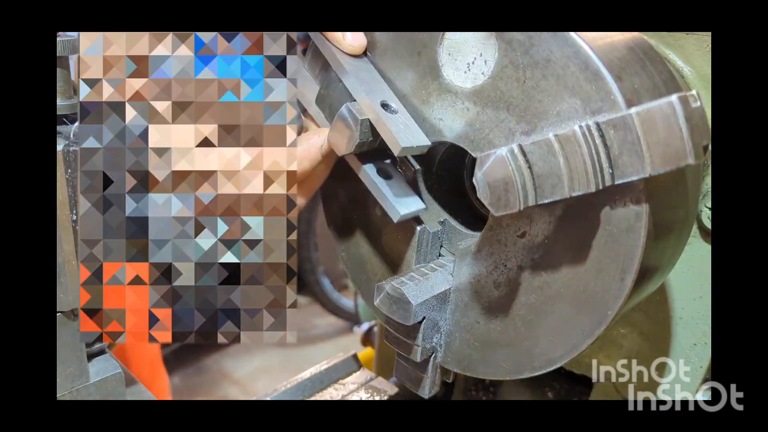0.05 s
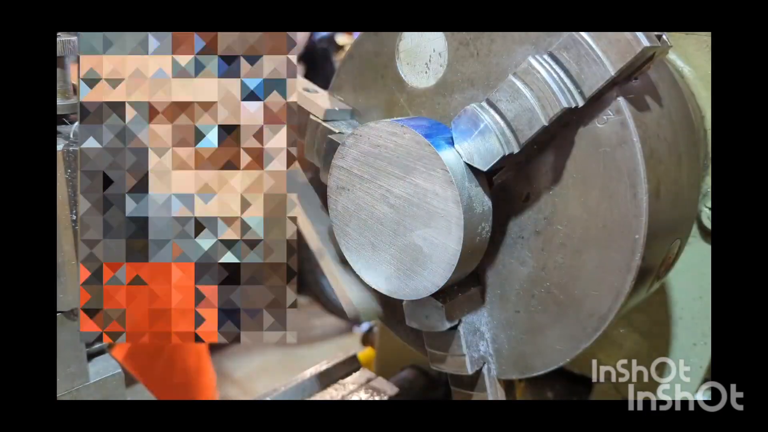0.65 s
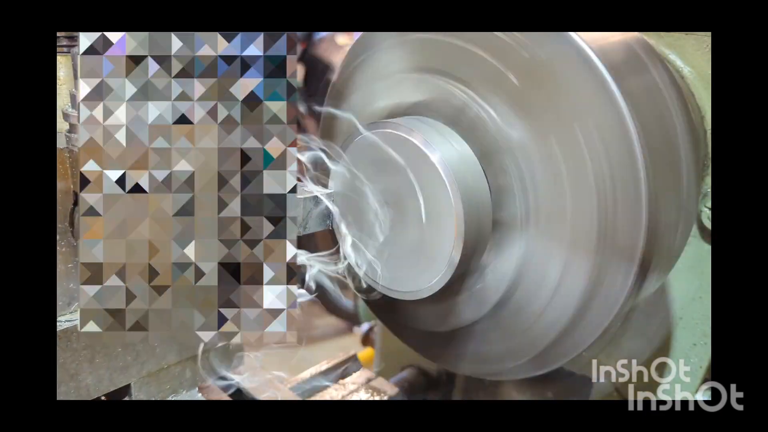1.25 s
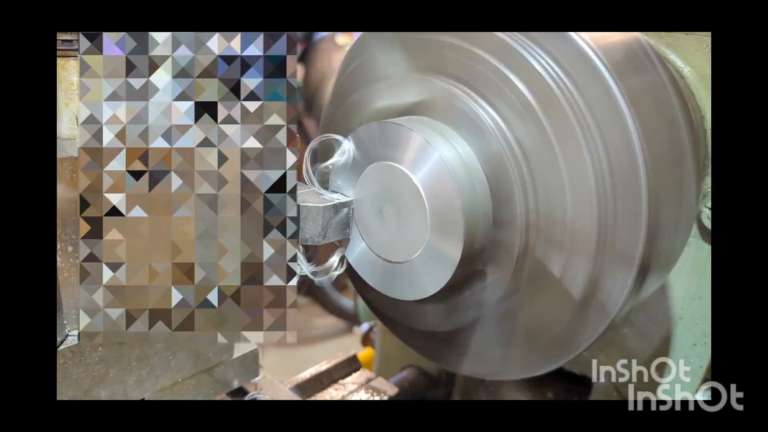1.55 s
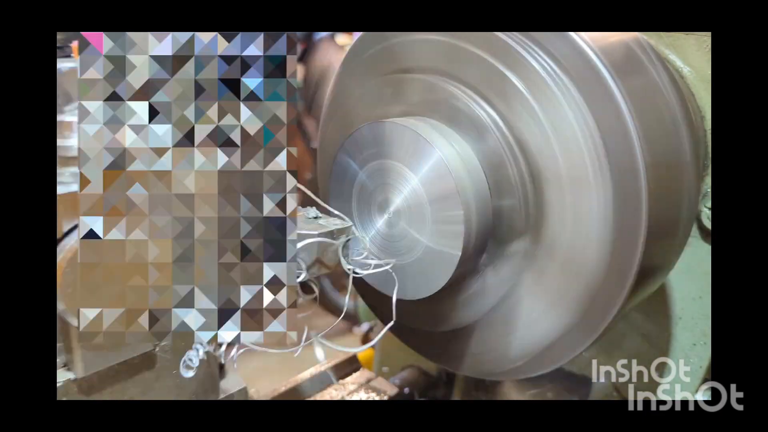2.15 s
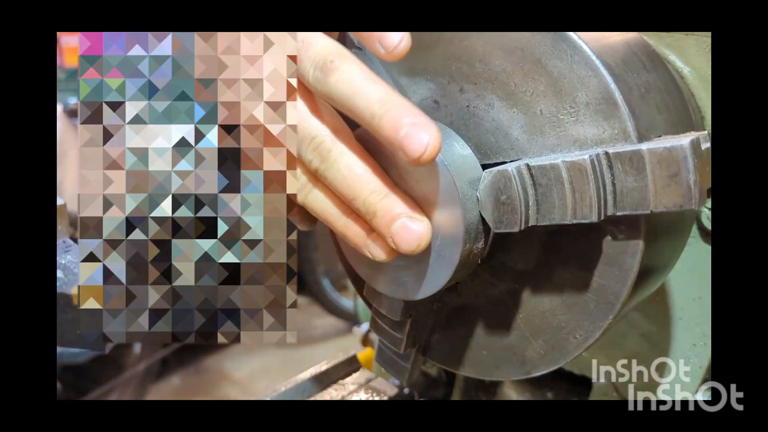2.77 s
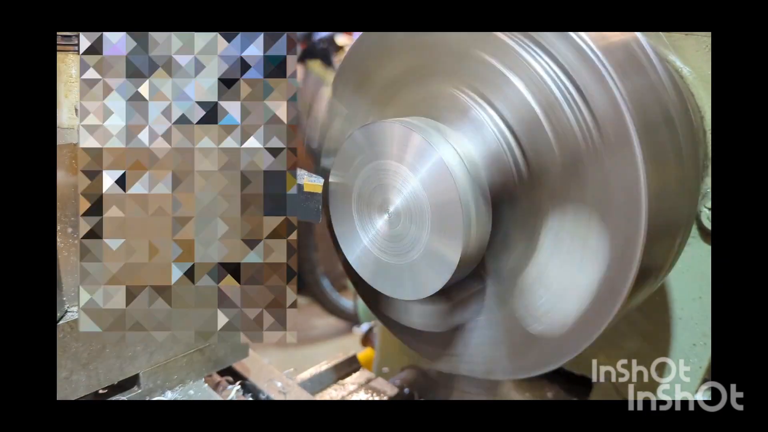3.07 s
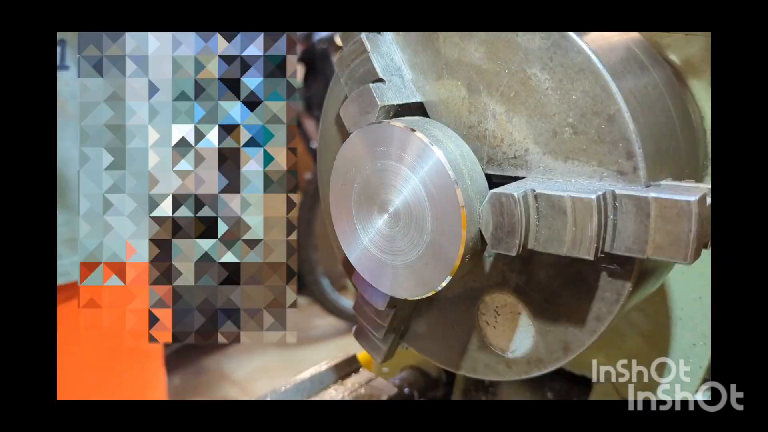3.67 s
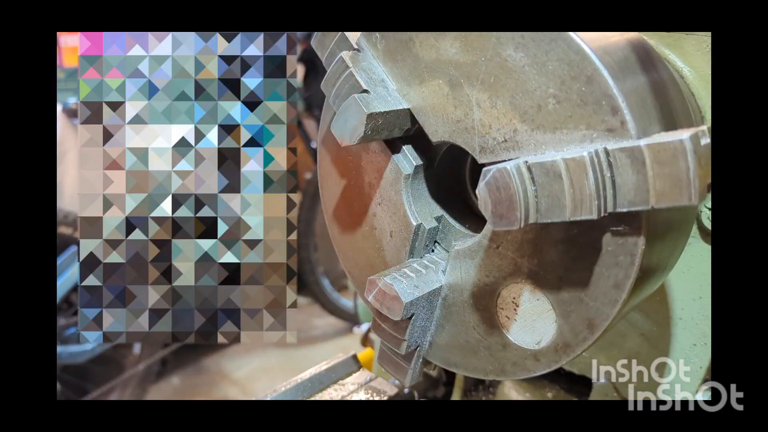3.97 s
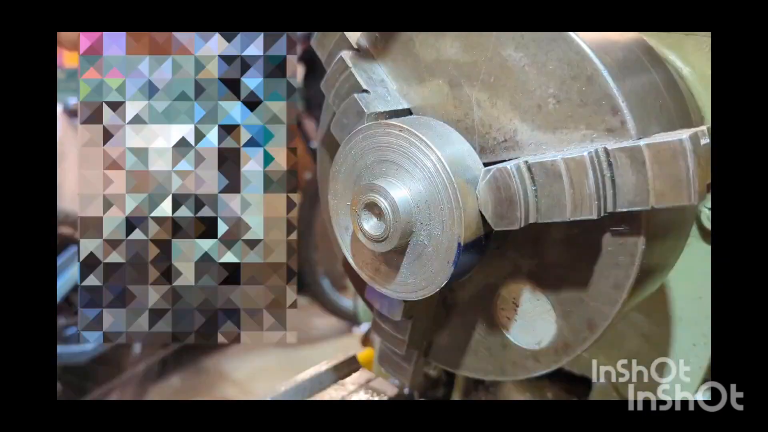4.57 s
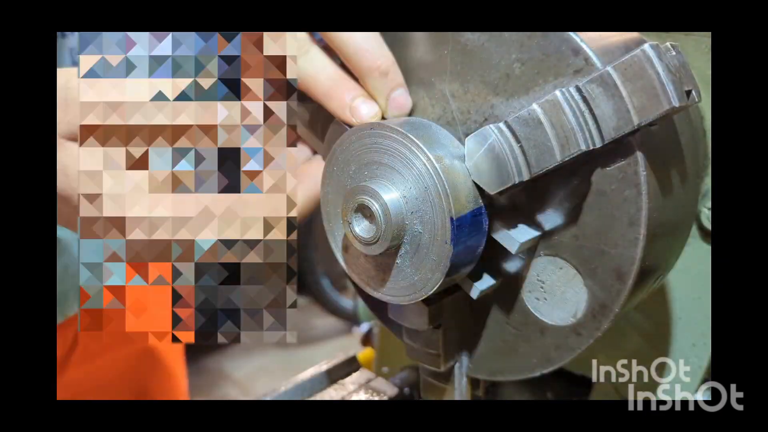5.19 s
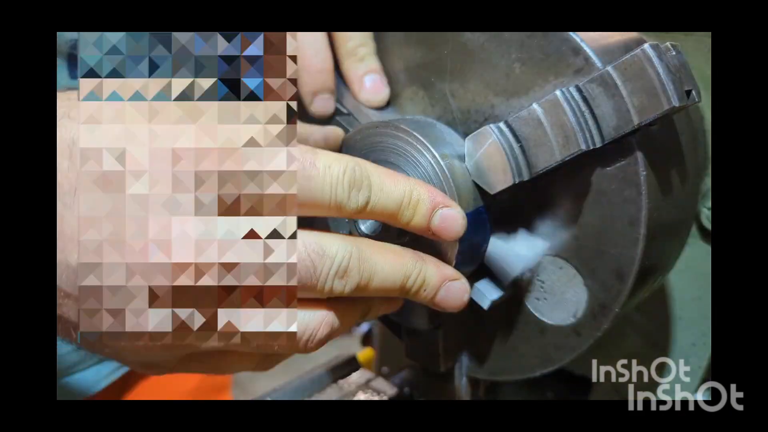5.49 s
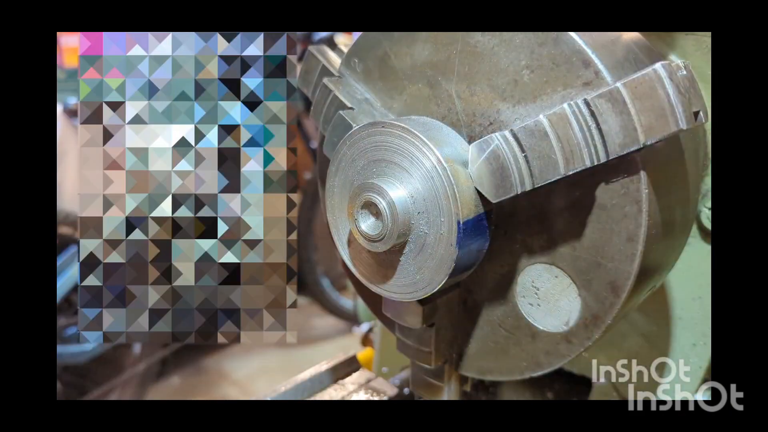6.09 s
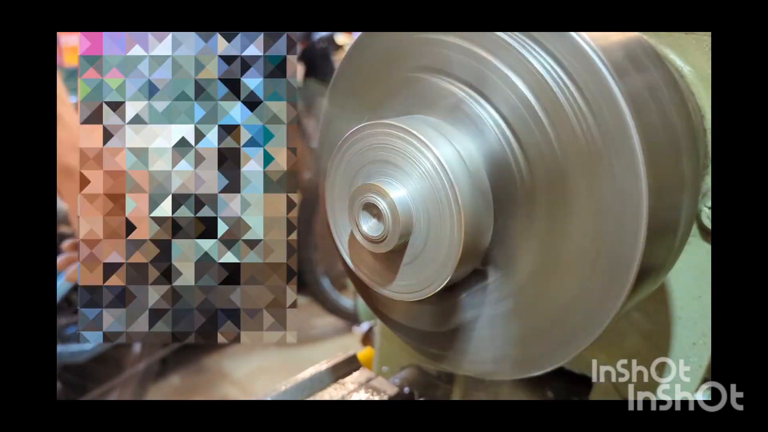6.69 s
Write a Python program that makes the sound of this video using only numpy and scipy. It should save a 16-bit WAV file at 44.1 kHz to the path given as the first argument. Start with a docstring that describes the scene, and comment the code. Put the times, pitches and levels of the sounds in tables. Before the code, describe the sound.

Sped-up workshop sounds: steel parts clink and knock in a chuck, while a lathe runs in three short, whining, humming bursts.

```python
"""A workshop with a metal lathe, in fast motion: every handling sound is squeezed into a short burst.
The spindle runs up three times. Its gear teeth excite the resonances of the headstock and sing at the
meshing rate, over motor hum and a thin drive whistle; in the first two runs the tool shears a hissing
chip from the disc. Between runs, steel blanks and spacers knock and clink in the chuck and hands rub
over them. The rumble and fan of the shop fall away late on, and a steady hiss sets in."""
import sys
import numpy as np
from scipy import signal
from scipy.fft import rfft, irfft, next_fast_len
from scipy.io import wavfile
from scipy.ndimage import uniform_filter1d

SR = 44100
rng = np.random.default_rng(int(sys.argv[2]) if len(sys.argv) > 2 else 0)


def log_audio(samples):
    """Write samples as a 16-bit WAV file to the path given in sys.argv[1]."""
    # one column per channel
    frames = np.atleast_2d(samples).T
    # limit to full scale, then quantise
    limited = np.clip(frames, -1, 1)
    pcm = np.round(limited * 32767).astype(np.int16)
    wavfile.write(sys.argv[1], SR, pcm)


N = 301644
TIME = np.arange(N) / SR
SPIN_UP_S, TOOTH_HZ = .208, 1288  # run-up time; tooth rate of the main gear running free

# spindle runs: (on t/s, off t/s, at rest t/s, gear level/dB, hum level/dB, starting strain/dB re gears)
SPINDLE_RUNS = [(0.867, 2.335, 2.353, -20.5, -29.5, -5.5), (3.023, 3.595, 3.565, -20.5, -27.5, -13.5),
                (6.295, 7, 7, -20.5, -28, -16)]
# tool passes: (bite t/s, exit t/s, hiss level/dB, easing by the end/dB, load on the drive 0-1)
TOOL_PASSES = [(1.119, 2.063, -32, -4, 0.99), (3.209, 3.323, -29.5, -7.5, 0.6), (3.4, 3.455, -43, 0, 0.03)]


def spindle(brake_s=.125, sag_hz=27.12):
    """Uniform acceleration and braking, slowed by the cut: speed (0-1), load (0-1), tooth rate/Hz."""
    speed = sum(ramp(on, SPIN_UP_S) * (1 - ramp(rest - brake_s, brake_s))
                for on, _, rest, *_ in SPINDLE_RUNS)
    load = sum(share * tool_force(bite, leave, easing_db)
               for bite, leave, _, easing_db, share in TOOL_PASSES)
    return speed, load, TOOTH_HZ * speed - sag_hz * load


def gearbox(drive, level_db=-.55, rattle_db=1.5, dull_hz=11000):
    """Forced vibration: densely rattling gear teeth excite the resonances of the headstock."""
    # spectrum of the rattle: (f/Hz, spectral level/dB)
    spectrum = [(20, -21), (45, -16.5), (100, -7.5), (200, -12), (300, -11), (700, -9.5), (1100, -12),
                (1260, -6.5), (1480, -13.5), (2300, -16), (3200, -21), (5000, -28.5), (8000, -38.5),
                (15500, -40)]
    # headstock resonances: (f/Hz, width/Hz, level/dB re the rattle)
    headstock = [(294, 50, -5), (482, 50, -5), (742, 55, -1), (915, 70, -4), (1750, 50, -5), (1920, 50, -4),
                 (2538, 55, -3), (3186, 55, 0), (4480, 130, -4), (6450, 60, 3)]
    def colour(hz):
        casting = np.sqrt(1 + 2 * modal_power(hz, headstock)) * ripple(hz, depth_db=2, spacing_hz=44.86)
        return amp(read(spectrum, hz)) * casting / np.hypot(1, (hz / dull_hz) ** 3)
    return amp(level_db) * drive * noise(colour, force=amp(rattle_db * wander(110)))


def gear_whine(drive, mesh_hz, load, level_db=-6, load_db=5.5, flare_db=8, flare_hz=1185, lag_rad=2.42):
    """Periodic tooth contact: a note that grows with load and, on run-up, sweeps a casing resonance."""
    acceleration = uniform_filter1d(np.gradient(mesh_hz) * SR, size=1000)
    torque = np.clip(acceleration * SPIN_UP_S / TOOTH_HZ, 0, 1)
    waver = .016 * wander(85)
    judder = .028 * torque * wander(60)
    phase = phase_of(mesh_hz * (1 + waver + judder))
    flutter = unit(amp(3 * wander(45)))
    radiation = np.clip((mesh_hz - 780) / 140, 0, 1)  # the casing hardly radiates at low speed
    strain = run_gain(column=5) * torque * (1 + amp(flare_db) * peak(mesh_hz, flare_hz, width_hz=49))
    steady = amp(level_db + load_db * load) * np.sin(phase + np.array([[-lag_rad], [lag_rad]]) / 2)
    return drive * radiation * flutter * (steady + strain * np.sin(phase))


def gear_train(drive, mesh_hz, waver=.0167, flutter_db=3):
    """Fixed gear ratios: the other gears sing faintly at multiples of the main tooth rate."""
    # gear orders: (f / main tooth rate)
    orders = [1.5, 2, 2.5, 3, 3.5, 5.1]
    # strength of each order: (level/dB re the gear noise)
    levels = [-12.5, -21.5, -18.5, -21, -23.5, -33.5]
    phase = phase_of(mesh_hz * (1 + waver * wander(99)))
    notes = sum(amp(db) * np.sin(order * phase + rng.random((2, 1)) * np.pi)
                for order, db in zip(orders, levels))
    return drive * unit(amp(flutter_db * wander(60))) * notes


def motor(drive, hum_hz=107.1, level_db=-1, waver=.054, throb_db=-.9):
    """Structure-borne sound: the motor's uneven hum shakes the whole bed."""
    phase = phase_of(hum_hz * (1 + waver * wander(25.7)))
    return drive * amp(level_db) * unit(np.sin(phase) * amp(throb_db * wander(39)))


def cutting(tear_db=-.5, surge_db=1):
    """Stick-slip: the chip shears off in fast uneven slips and surges as it curls."""
    # hiss of the chip: (f/Hz, spectral level/dB)
    chip = [(1500, -23), (3000, -6.5), (4400, -0.5), (5600, -4.5), (7300, -7.5), (8250, -15), (8950, -3),
            (9500, -12), (10900, -13.5), (11900, -6.5), (15500, -12.5)]
    force = sum(amp(db) * tool_force(bite, leave, easing_db)
                for bite, leave, db, easing_db, _ in TOOL_PASSES)
    return force * amp(surge_db * wander(30)) * wash(chip, force=amp(tear_db * wander(300)))


def tool_force(bite, leave, easing_db, bite_s=.039, release_s=.037):
    """Cutting force rises as the tool bites, eases as it feeds across and decays as it runs out."""
    easing = amp(easing_db * ramp(bite, leave - bite))
    release = np.exp(-np.maximum(TIME - leave, 0) / release_s)
    return ramp(bite, bite_s) * easing * release


def drive_whistle(centre_hz=10040, width_hz=480, level_db=-48, flutter_db=2, switch_s=.018):
    """Switching noise: the drive gives off a narrow, fuzzy band while power is on."""
    powered = sum(ramp(on, switch_s) - ramp(off - switch_s, switch_s) for on, off, *_ in SPINDLE_RUNS)
    gain = amp(level_db + flutter_db * wander(31))
    return gain * powered * noise(lambda hz: peak(hz, centre_hz, width_hz) ** 3)


def knocks(thud_width_hz=310, chatter_db=2, lead_s=.0015):
    """Impact excitation: each blow is a dull thud under a chatter of steel that rings the chuck."""
    # blows: (t/s, duration/s, thud f/Hz, thud level/dB, chatter level/dB, tilt from band to band/dB)
    blows = [(0.282, 0.02, 345, -33, -51, -11), (0.327, 0.021, 440, -43.5, -53.5, -2),
             (.405, .012, 525, -32, -39, -4), (0.438, .024, 448, -38.5, -44.5, 0),
             (.515, 0.021, 505, -50, -47.5, 1.5), (0.665, .016, 190, -39, -50.5, 1),
             (.753, .021, 408, -31.5, -38.5, -10.5), (.767, .017, 302, -22.5, -26, 1),
             (0.835, 0.02, 240, -45, -44, 1), (2.605, 0.032, 300, -39.5, -47.5, -9.5),
             (2.649, 0.02, 171, -36.5, -58.5, -8), (2.708, 0.024, 181, -39, -56, -5),
             (2.993, 0.015, 504, -59, -40, -1), (3.673, 0.0071, 270, -38.5, -39, 6.5),
             (4.076, 0.015, 525, -37, -54.5, -11), (4.102, 0.016, 347, -40.5, -54, -6),
             (4.17, .016, 386, -28.5, -49.5, -17.5), (4.203, .011, 238, -40, -73, -10),
             (4.303, 0.013, 340, -62, -49, 2.5), (4.486, 0.011, 286, -46.5, -56.5, 2.5),
             (4.556, .017, 365, -45, -44, 0), (4.576, .022, 455, -40, -50.5, 4),
             (4.793, 0.017, 290, -45, -58, -6), (5.347, 0.016, 175, -54.5, -61, -0.5),
             (5.39, 0.0079, 322, -40, -47, -1), (5.436, .028, 201, -46, -33.5, 4.5),
             (5.718, 0.0092, 209, -44, -64, 0), (5.762, 0.017, 185, -44.5, -63, 0),
             (6.039, 0.023, 264, -26, -25.5, 2), (6.138, 0.017, 239, -38, -57, -1),
             (6.226, 0.022, 295, -25, -34, -1)]
    # chuck resonances: (f/Hz, width/Hz, level/dB re the chatter)
    chuck = [(790, 140, 5), (1213, 31, 10), (1458, 61, 1), (1675, 48, 10), (2060, 260, 7.5),
             (2580, 78, 5.5), (3140, 54, 8), (4448, 54, 9), (6700, 77, 12), (12400, 190, -7)]
    # body, clack and scrape bands of the chatter: (lower f/Hz, upper f/Hz)
    bands = [(550, 1400), (1400, 4000), (4000, 14000)]
    def colour(hz, low_hz, high_hz):
        body = ripple(hz, depth_db=3, spacing_hz=160.5) * np.sqrt(1 + modal_power(hz, chuck)) / (hz + 100)
        return body / np.hypot(1, (low_hz / (hz + 1)) ** 6) / np.hypot(1, (hz / high_hz) ** 6)
    out = np.zeros((2, N))
    for start, length, thud_hz, thud_db, steel_db, tilt_db in blows:
        shape = contact(length, lateness=.74)
        size = len(shape)
        thud = noise(lambda hz: peak(hz, thud_hz, thud_width_hz) ** 3, size=size)
        sound = amp(thud_db) * unit(shape * thud)
        force = amp(chatter_db * wander(330, size))
        for edges, band_db in zip(bands, [-1 - tilt_db, 2, -4 + tilt_db]):
            chatter = noise(lambda hz: colour(hz, *edges), force, size)
            sound += amp(steel_db + band_db) * unit(shape * chatter)
        add(out, start - lead_s, sound)
    return out


def clinks(jaw_hz=1470, jaw_db=-20, grit_width_hz=850, detune=.0058, hard_contact_s=.011, lead_s=.0031):
    """Modal ringing: chattering steel sounds until the hand damps it; grit blurs each spectral line."""
    # contacts: (t/s, duration/s, lowest steel mode f/Hz, its level/dB, upper level/dB, grit/dB re ring)
    contacts = [(.002, 0.023, 3793, -43, -42.5, -5), (0.03, 0.015, 4110, -33.5, -49, -10),
                (.183, 0.004, 4080, -43.5, -60, -3), (0.606, 0.019, 3746, -20.5, -23, -21),
                (0.621, 0.029, 4050, -33, -44, -6.5), (.701, 0.025, 4090, -43.5, -41.5, 6),
                (2.832, 0.021, 4060, -52.5, -58, 12), (3.675, 0.0051, 3720, -31.5, -57, 18),
                (4.562, 0.014, 4070, -53, -59, 0), (4.575, 0.024, 3780, -55, -45.5, -4),
                (4.632, .024, 3780, -41, -51.5, -8), (4.72, 0.012, 3800, -53.5, -57, 0),
                (4.7401, 0.0047, 3730, -29, -27.5, 0), (4.756, 0.016, 3770, -60, -51.5, 7),
                (4.863, 0.025, 4130, -61, -59, 2), (4.964, 0.025, 3790, -48.5, -53.5, -4),
                (5.01, .018, 3830, -58.5, -74, 2), (5.4455, .0045, 4304, -26.5, -29.5, 8),
                (5.459, 0.0066, 4270, -30, -22, 6), (6.039, .023, 3940, -48, -23.5, -5)]
    # middle and high group of steel modes, each mode: (f/Hz, level/dB)
    upper_modes = [
        [(5800, -11), (7115, 0), (7360, -14), (8880, -19)],
        [(10250, -13), (11090, 0), (11700, -7), (12160, -12)],
    ]
    out = np.zeros((2, N))
    for start, length, lowest_hz, low_db, upper_db, grit_db in contacts:
        shape = contact(length, lateness=1.46)
        size = len(shape)
        t = np.arange(size) / SR * (1 + detune * rng.standard_normal())  # the grip shifts the modes
        top_db = upper_db - 4 * np.log2(length / hard_contact_s)  # longer contacts are duller
        groups = [[(lowest_hz, 0), (jaw_hz, jaw_db)]] + upper_modes
        for modes, group_db in zip(groups, [low_db, upper_db, top_db]):
            ring = unit(sum(steel_mode(t, f, db) for f, db in modes))
            grit = noise(lambda hz: sum(amp(db) * peak(hz, f, grit_width_hz) ** 2 for f, db in modes),
                         size=size)
            add(out, start - lead_s, amp(group_db + low_db * 0) * unit(shape * (ring + amp(grit_db) * grit)))
    return out * amp([[-.8], [.6]])


def steel_mode(t, hz, level_db, spread_db=3, ear_cycles=.46, jitter_rad=.22):
    """One normal mode with phase jitter, reaching each ear at its own level and phase."""
    gain = amp(level_db + spread_db * rng.standard_normal((2, 1)))
    cycles = hz * t + rng.random() + rng.random((2, 1)) * ear_cycles
    return gain * np.sin(2 * np.pi * cycles + jitter_rad * wander(263, len(t)))


def contact(length, lateness, edge_s=.0037):
    """Force pulse of a brief contact; a lateness over 1 makes it swell slowly and stop short."""
    progress = np.linspace(0, 1, int((length + edge_s) * SR))
    return unit(np.sin(np.pi * progress ** lateness).clip(0) ** .71)


def room(x, wet_db=-33, t60_s=.07):
    """Reverberation: reflections from the machine and walls leave a faint exponential tail."""
    t = np.arange(SR // 5) / SR
    tail = rng.standard_normal((2, len(t))) * amp(-60 * t / t60_s)
    return x + amp(wet_db) * signal.fftconvolve(x, tail / np.linalg.norm(tail[0]), axes=1)[:, :N]


def hands(touch_db=-69, gain_db=-1, swell_db=3):
    """Friction noise: skin rubs over steel in strokes, with light handling between them."""
    # strokes: (middle t/s, duration/s, level/dB)
    strokes = [(0.09, 0.18, -71), (0.368, 0.073, -60), (0.779, 0.13, -48), (2.434, 0.12, -59),
               (2.777, 0.22, -60.5), (3.69, 0.39, -66.5), (4.664, 0.24, -63), (5.046, 0.13, -65)]
    # skin on steel: (f/Hz, spectral level/dB)
    rustle = [(1500, -24), (3200, -6), (3900, 1.5), (4800, -5.5), (6000, 1.5), (7150, -2), (8200, -4.5),
              (9500, -8.5), (11500, -5), (13000, -5), (15500, -10.5)]
    rubbing = sum(amp(db) * np.exp(-(2 * (TIME - middle) / length) ** 2) for middle, length, db in strokes)
    return (amp(touch_db) + rubbing) * amp(gain_db + swell_db * wander(16)) * wash(rustle)


def shop(rumble_gain_db=7, fan_gain_db=3):
    """Broadband ambient noise: a low rumble and a distant fan, both falling away late in the scene."""
    # course of the background: (t/s, rumble level/dB, fan level/dB)
    course = [(.1, -55.5, -54.5), (2.45, -56, -56), (2.8, -53, -54), (3.61, -49, -54), (4.0, -57, -57),
              (4.65, -61, -60), (5.23, -72.5, -61), (5.3, -83, -76.5)]
    # rumble of the shop: (f/Hz, spectral level/dB)
    rumble_spectrum = [(12, -49.5), (20, -13.5), (48, -2.5), (182, -1), (231, -3), (365, -5.5), (420, -12),
                       (551, -13), (600, -26), (780, -55.5), (1320, -120)]
    # rush of the fan: (f/Hz, spectral level/dB)
    fan_spectrum = [(250, -22.5), (500, 1), (900, 0), (1400, -0.5), (2250, -2), (2750, -12), (4000, -24.5),
                    (8000, -38.5)]
    times, rumble_db, fan_db = np.transpose(course)
    rumble = amp(rumble_gain_db + np.interp(TIME, times, rumble_db)) * wash(rumble_spectrum)
    fan = amp(fan_gain_db + np.interp(TIME, times, fan_db)) * wash(fan_spectrum)
    return rumble + fan


def late_hiss(start_s=5.455, rise_s=.078, level_db=-45.5):
    """Stationary noise: a broad hiss sets in and holds."""
    # the hiss: (f/Hz, spectral level/dB)
    spectrum = [(30, -6), (95, -6), (200, -8), (360, -11), (450, 1.5), (560, -9), (830, -6.5), (1270, -10),
                (1480, -5), (1980, -0.5), (2550, -5), (2850, -9), (4100, -6), (4500, -9.5), (5400, -12),
                (12300, -13), (15500, -15.5)]
    return amp(level_db) * ramp(start_s, rise_s) * wash(spectrum)


def shop_drone(hum_hz=104, width_hz=25, level_db=-61):
    """Narrow-band noise, heard as a faint wavering drone."""
    return amp(level_db) * noise(lambda hz: peak(hz, hum_hz, width_hz) ** 2)


def noise(colour, force=1., size=N, lag_rad=.24):
    """Source and filter: partly coherent stereo noise of rms 1, shaped by a force and a gain colour(f)."""
    # coherence of the sound field: (f/Hz, left-right correlation)
    coherence = [(100, 0.98), (200, 0.86), (290, 0.69), (420, 0.79), (520, 0.59), (600, -0.31), (740, 0.58),
                 (850, -0.1), (970, 0.23), (1300, -0.6), (1600, 0.00054), (1950, -0.041), (2500, 0.04),
                 (5000, -0.0088)]
    count = next_fast_len(size)
    hz = np.fft.rfftfreq(count, 1 / SR)
    a, b = rfft(rng.standard_normal((2, size)) * force, count)
    correlation = read(coherence, hz)
    mid, side = a * np.sqrt(1 + correlation), b * np.sqrt(1 - correlation)
    left_delay = np.exp(-1j * lag_rad * np.tanh(hz / 300))
    spectra = np.array([(mid + side) * left_delay, mid - side]) * colour(hz)
    return unit(irfft(spectra, count)[:, :size])


def wash(spectrum, force=1.):
    """Noise with a tabled spectrum."""
    return noise(lambda hz: amp(read(spectrum, hz)), force)


def peak(hz, centre_hz, width_hz):
    """Magnitude response of a damped resonator."""
    return 1 / np.hypot(1, (hz ** 2 - centre_hz ** 2) / (hz * width_hz + 1e-6))


def modal_power(hz, modes):
    """Incoherent sum: resonances add in power."""
    return sum((amp(db) * peak(hz, f, width)) ** 2 for f, width, db in modes)


def ripple(hz, depth_db, spacing_hz):
    """The many small resonances of a heavy casting make its gain vary randomly with frequency."""
    grid = np.arange(0, SR / 2, spacing_hz)
    return amp(depth_db * np.interp(hz, grid, rng.standard_normal(SR // 20 + 1)[:len(grid)]))


def wander(rate_hz, size=N):
    """Random fluctuation of rms 1, low-passed at rate_hz."""
    hz = np.fft.rfftfreq(size, 1 / SR)
    return unit(irfft(rfft(rng.standard_normal(size)) / (1 + (hz / rate_hz) ** 4), size))


def run_gain(column):
    """One level column of SPINDLE_RUNS as a gain, held from each start to the next."""
    runs = np.array(SPINDLE_RUNS)
    return amp(runs[:, column])[np.searchsorted(runs[1:, 0], TIME)]


def phase_of(hz):
    """Phase is the time integral of frequency."""
    return 2 * np.pi * np.cumsum(hz) / SR


def ramp(start, length):
    """Linear rise from 0 to 1."""
    return np.clip((TIME - start) / length, 0, 1)


def read(points, hz):
    """Interpolation on a log-frequency axis."""
    f, value = np.transpose(points)
    return np.interp(np.log(hz + 1), np.log(f + 1), value)


def add(mix, start_s, sound):
    """Superposition of a stereo sound on the mix."""
    part = mix[:, max(round(start_s * SR), 0):][:, :sound.shape[1]]
    part += sound[:, :part.shape[1]]


def amp(db):
    """Amplitude ratio of a level."""
    return 10 ** (np.asarray(db) / 20)


def unit(x):
    """Normalisation to rms 1."""
    return x / np.sqrt(np.mean(x ** 2) + 1e-20)


def scene():
    """Gears and motor grow as a power of speed and with load; handling and background add to them."""
    speed, load, mesh_hz = spindle()
    gear_drive = run_gain(column=3) * speed ** 1.166 * amp(1.5 * load)
    hum_drive = run_gain(column=4) * speed ** 1.15 * amp(4.5 * load)
    gears = gearbox(gear_drive) + gear_whine(gear_drive, mesh_hz, load) + gear_train(gear_drive, mesh_hz)
    lathe = (gears + cutting() + drive_whistle()) * amp([[-.5], [.5]]) + motor(hum_drive)
    return lathe + room(knocks() + clinks()) + shop() + hands() + late_hiss() + shop_drone()


def record(dry):
    """Band limiting: a linear-phase low-pass at 15.9 kHz."""
    lowpass = signal.firwin(511, 15900, window=("kaiser", 9), fs=SR)
    return signal.oaconvolve(dry, lowpass[None], "same")


dry = scene()
out = record(dry)
log_audio(out)
```